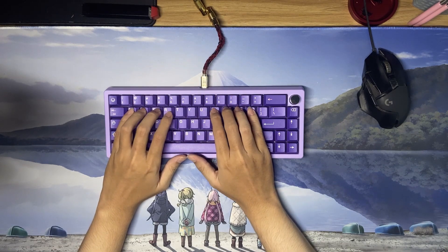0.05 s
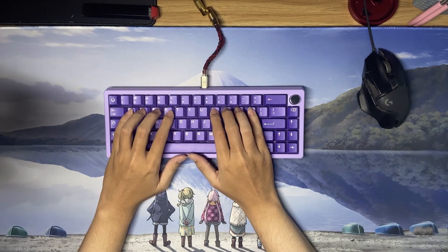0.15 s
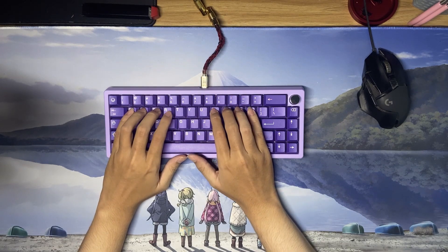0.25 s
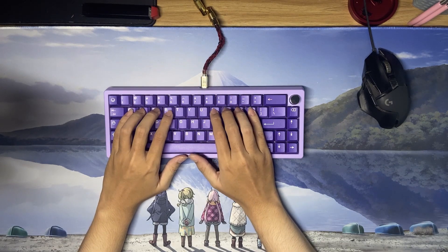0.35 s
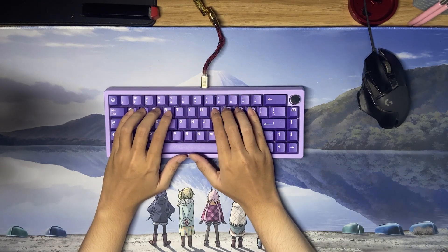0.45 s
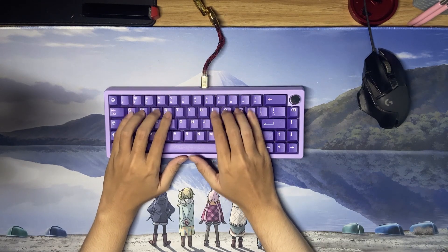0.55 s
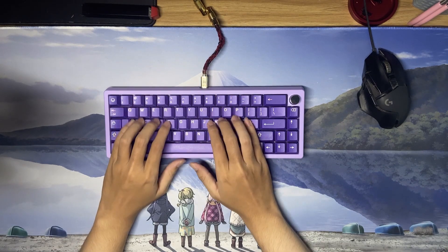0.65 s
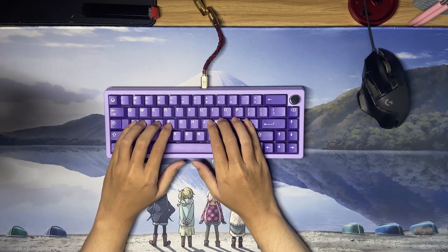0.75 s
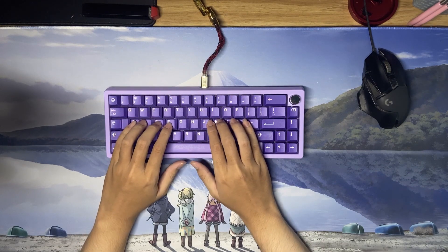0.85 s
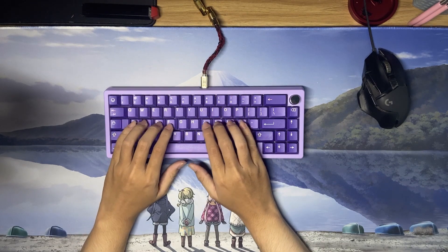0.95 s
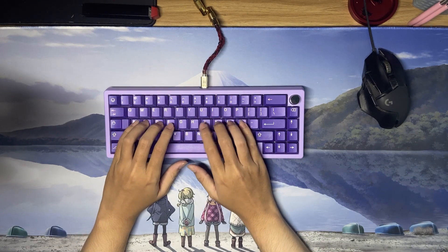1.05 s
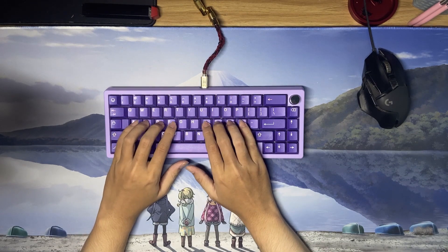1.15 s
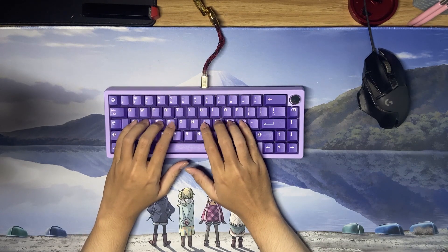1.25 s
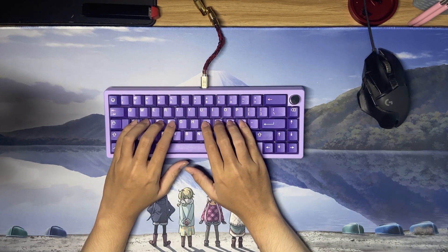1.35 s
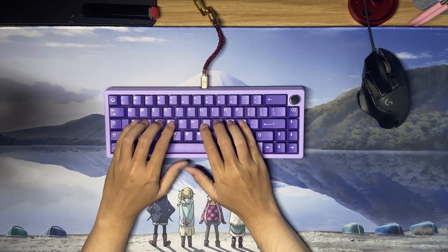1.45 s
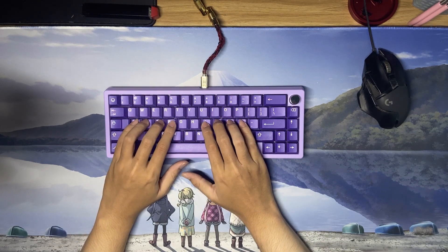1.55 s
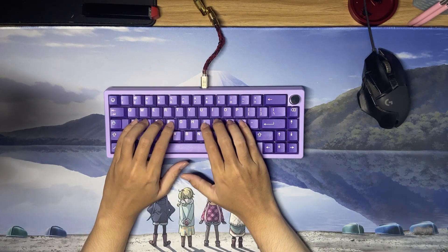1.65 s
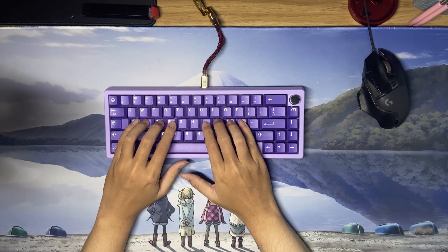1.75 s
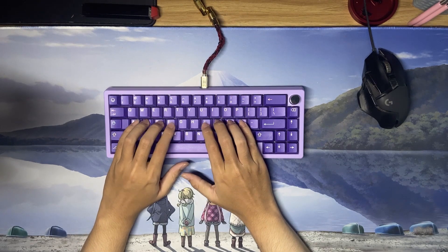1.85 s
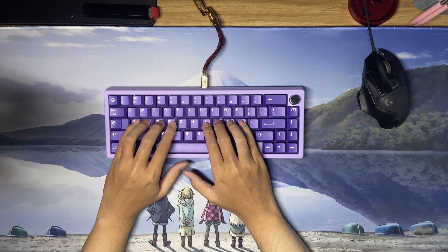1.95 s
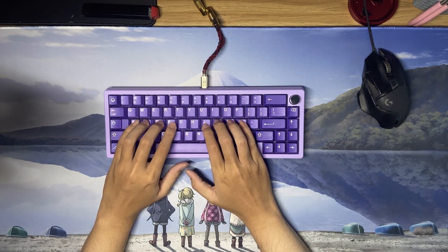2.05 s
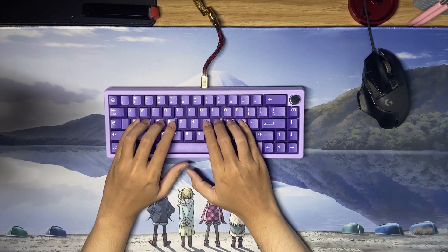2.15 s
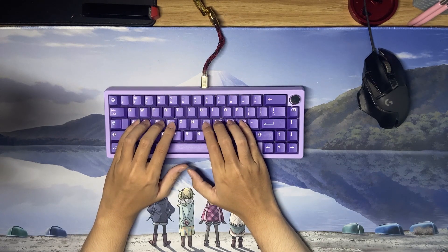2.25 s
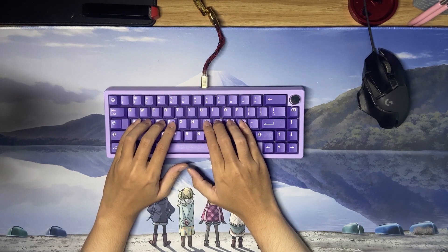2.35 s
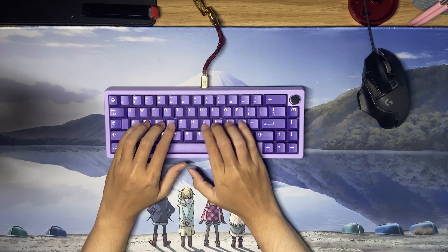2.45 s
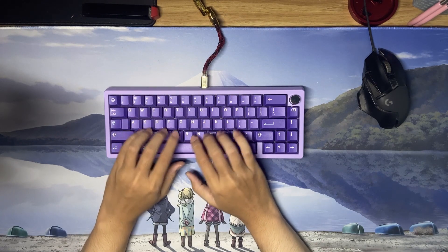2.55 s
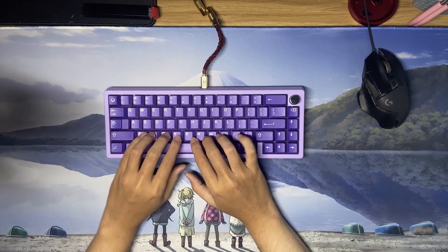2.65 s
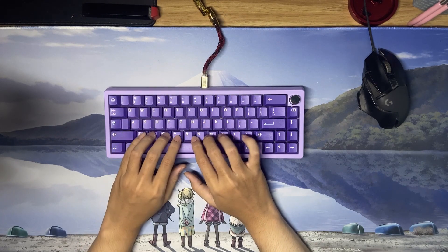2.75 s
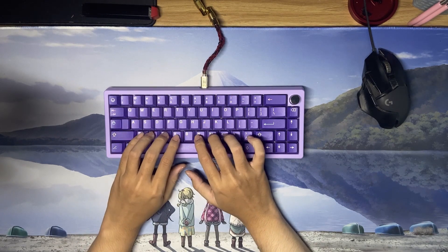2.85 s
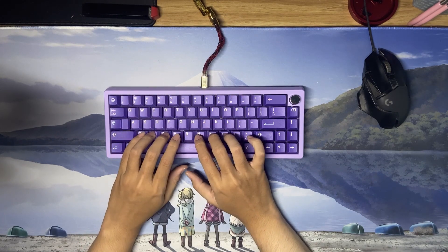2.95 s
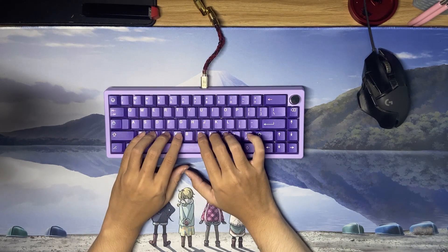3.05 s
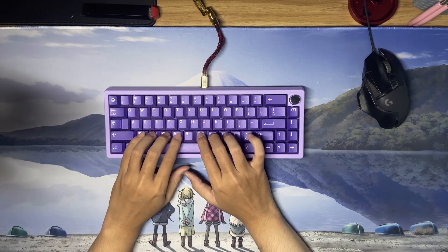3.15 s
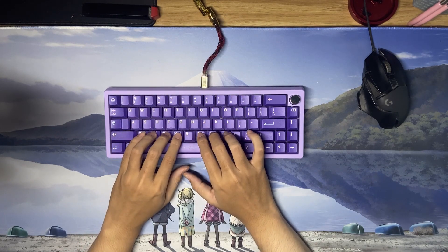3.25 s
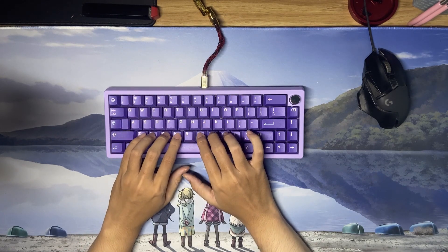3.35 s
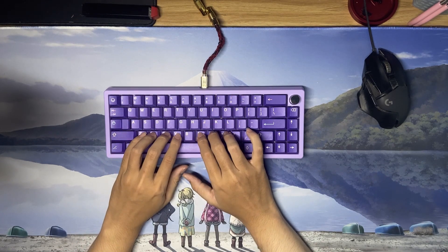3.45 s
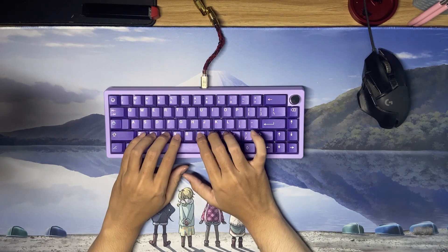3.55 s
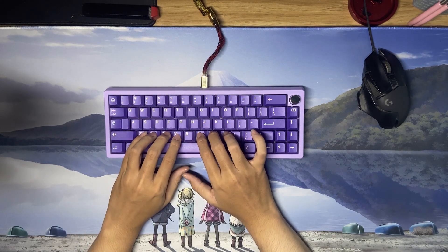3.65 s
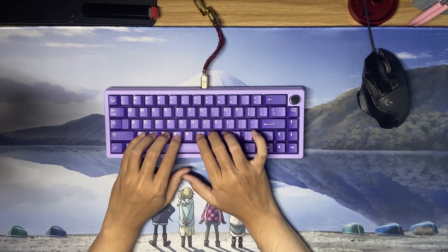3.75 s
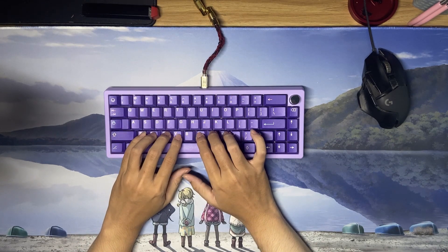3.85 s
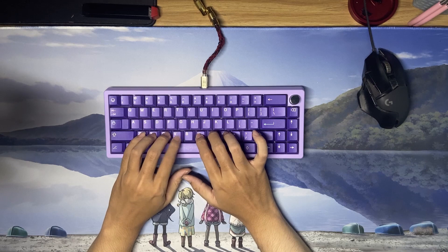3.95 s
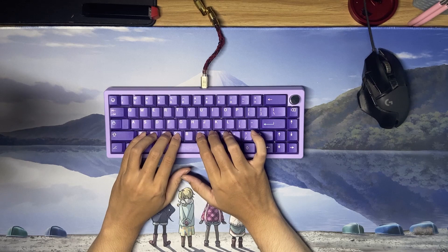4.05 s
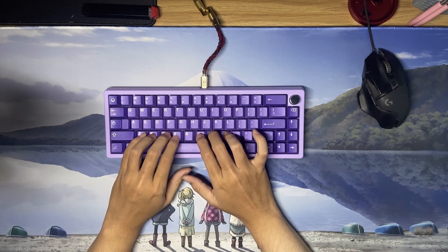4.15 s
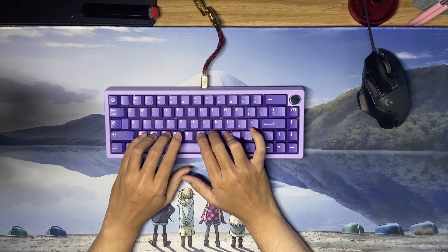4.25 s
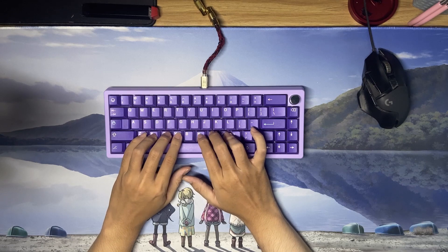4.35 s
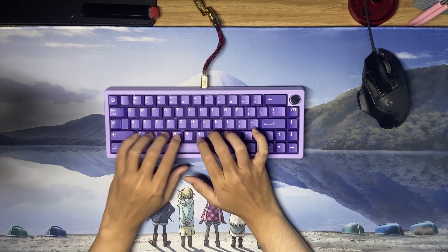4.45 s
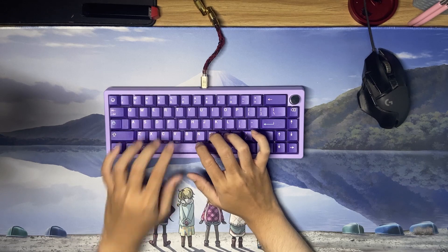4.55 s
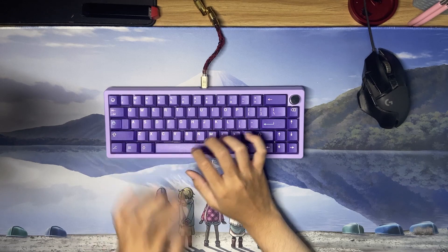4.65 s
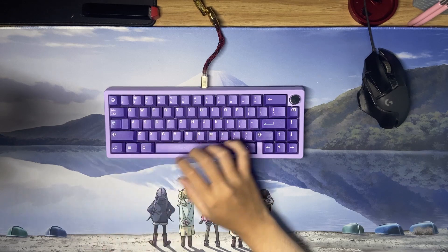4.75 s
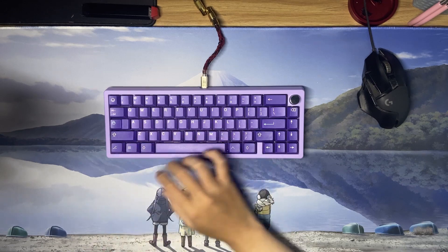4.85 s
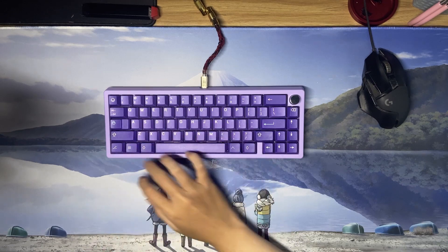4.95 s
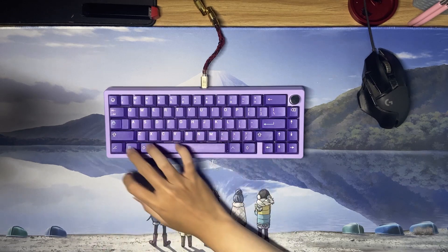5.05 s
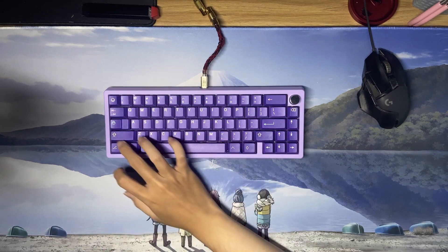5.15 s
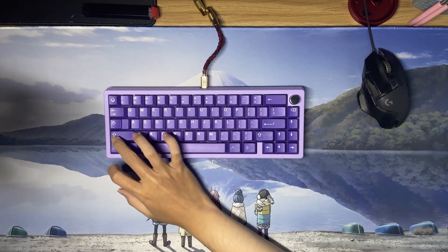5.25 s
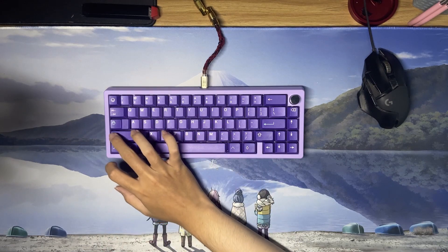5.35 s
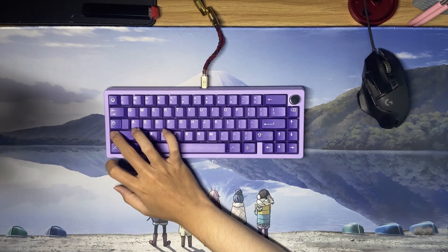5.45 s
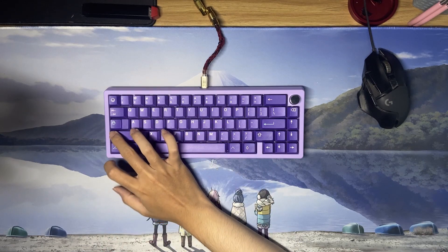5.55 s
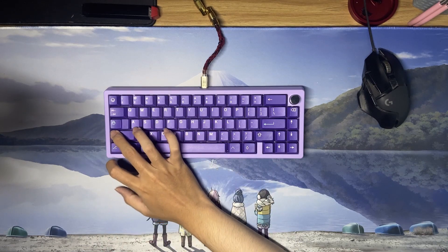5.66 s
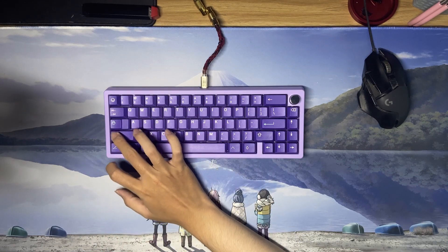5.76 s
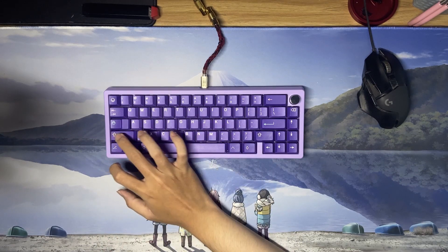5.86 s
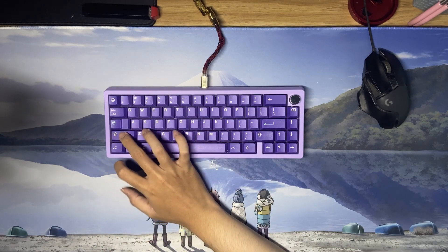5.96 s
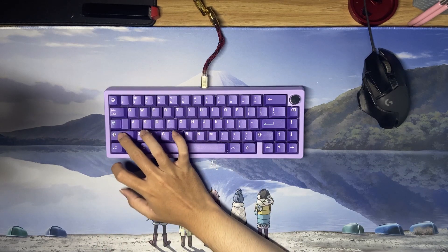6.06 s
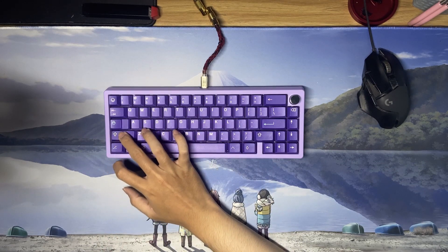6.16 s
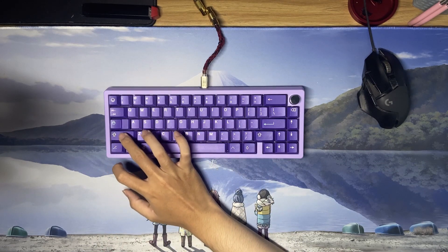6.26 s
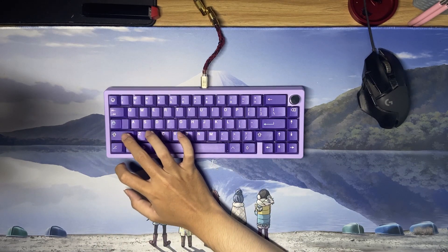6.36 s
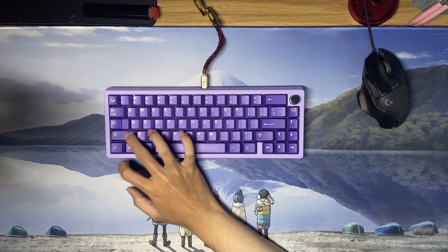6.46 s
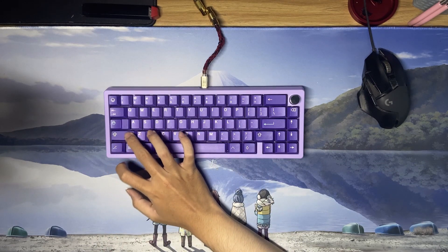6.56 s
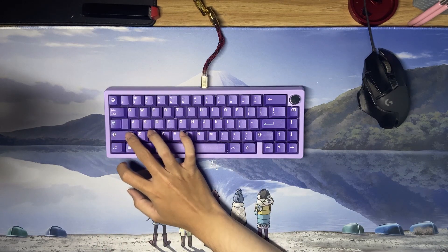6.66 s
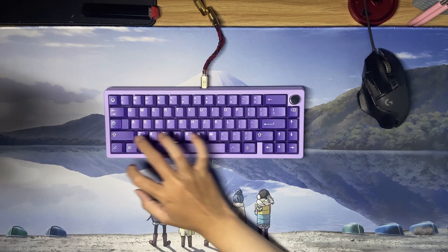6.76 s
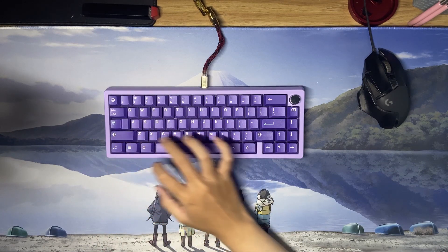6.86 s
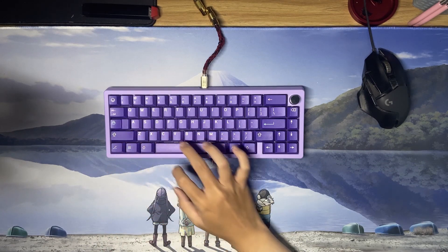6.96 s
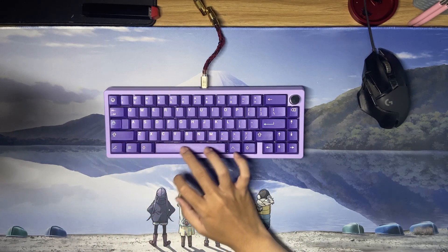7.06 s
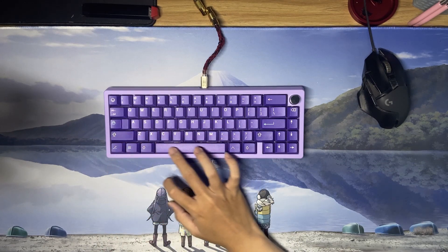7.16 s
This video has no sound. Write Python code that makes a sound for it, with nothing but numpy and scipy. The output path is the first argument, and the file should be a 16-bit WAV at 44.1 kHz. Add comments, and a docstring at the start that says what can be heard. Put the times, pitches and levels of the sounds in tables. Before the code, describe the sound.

Rapid smooth key clacks on a desk mat, a break, then one hand slowly pressing big stabilizer keys that thock and rattle metallically.

```python
"""Fast typing on a mechanical keyboard with linear switches, in three bursts, on a desk mat near a microphone.
Each landing or returning key is a blow that excites the resonances of its cap and case.
Then one hand tries the wide keys at the left edge: stems scrape, plate modes ring and metal pings.
Hands brush over the caps as swells of noise, and the desk thumps softly as decaying or swelling sines.
Wavering sines make the hum of a fan, over steady coloured noise, in a small dry room."""
import sys
import numpy as np
from scipy import signal
from scipy.fft import rfft, irfft
from scipy.io import wavfile

SR = 44100
rng = np.random.default_rng(int(sys.argv[2]) if len(sys.argv) > 2 else 0)


def log_audio(samples):
    """Write samples as a 16-bit WAV file to the path given in sys.argv[1]."""
    # one column per channel
    frames = np.atleast_2d(samples).T
    # limit to full scale, then quantise
    limited = np.clip(frames, -1, 1)
    pcm = np.round(limited * 32767).astype(np.int16)
    wavfile.write(sys.argv[1], SR, pcm)


N = 317079
SIZE = 4096  # samples in one impulse response
HZ = np.maximum(np.arange(SIZE // 2 + 1) * SR / SIZE, 1)
T = np.arange(N) / SR

# Clear strokes of letter keys, landing or springing back.
# Each row: time in seconds, energy of the direct blow in dB, cap resonance in Hz.
LETTER_STROKES = [(.0086, -2, 3480), (0.0159, -4.5, 3540), (0.0406, 1, 3050), (0.0589, 4.5, 3060),
                  (.0826, -2, 3040), (.1202, -11, 2470), (.1732, -12, 2680), (0.1888, -5.5, 2510),
                  (0.2041, -7.5, 3540), (.2193, -4, 3020), (0.2301, 2, 2440), (0.263, 2.5, 2940),
                  (0.3001, -6.5, 2860), (.3098, -3, 2300), (.3496, -10.5, 2860), (0.3685, -1.5, 2520),
                  (0.4225, -1.5, 3000), (0.4373, -0.5, 2650), (.4469, 3, 2760), (.4663, -6, 2700),
                  (0.5152, -11, 2000), (.5222, -14, 2580), (0.5745, -14.5, 2480), (1.006, -22, 2520),
                  (1.0453, -0.5, 2410), (1.0529, -4, 3020), (1.0636, .5, 2620), (1.0691, 3, 3000),
                  (1.1007, 1.5, 2970), (1.1115, -4, 2960), (1.1501, 0, 1990), (1.2133, -6.5, 2740),
                  (1.2396, 0, 3000), (1.2555, -2.5, 3180), (1.2721, 5, 3000), (1.279, 6, 2710),
                  (1.319, 3.5, 2800), (1.3418, -4, 2950), (1.3608, -0.5, 3040), (1.3749, -6.5, 2440),
                  (1.388, -6, 2470), (1.4283, -1.5, 2240), (1.4727, -.5, 3450), (1.4906, 1, 3250),
                  (1.4955, 5, 2580), (1.5352, -1, 3040), (1.5671, 1.5, 2780), (1.5723, -5.5, 2580),
                  (1.6271, -1.5, 2440), (1.6368, -5.5, 2360), (1.6725, 3.5, 3300), (1.6774, 5, 2840),
                  (1.7055, 1, 2900), (1.7366, 1, 2900), (1.7684, -4.5, 2100), (1.7718, -3.5, 2400),
                  (1.835, 1, 2320), (1.8637, -6.5, 3830), (1.8825, 2.5, 3030), (1.889, 6, 2580),
                  (1.8958, 1, 3160), (1.932, -2.5, 2770), (1.9994, -3.5, 1990), (2.0384, -3.5, 2430),
                  (2.0593, -2.5, 2230), (2.0833, 0, 3600), (2.1064, 2, 3040), (2.117, 7, 2850),
                  (2.138, 1.5, 2830), (2.1974, -0.5, 2180), (2.2073, -6, 2300), (2.2403, -6, 2360),
                  (2.2815, -14.5, 3870), (2.306, -3, 2960), (2.3102, 2, 2800), (2.323, 2, 2970),
                  (2.4129, -3, 2150), (2.442, -4.5, 2230), (2.9432, -7.5, 2730), (2.9612, 0, 2720),
                  (2.987, 3, 2600), (3.0037, -3.5, 2720), (3.0218, -4, 2420), (3.0428, 1, 2710),
                  (3.077, -6, 2080), (3.094, -5, 2330), (3.1488, -4, 2270), (3.1926, 3.5, 2860),
                  (3.205, -5, 2790), (3.249, 3, 3500), (3.2814, -4, 2700), (3.3012, -8, 2380),
                  (3.351, -6.5, 2500), (3.3833, 4, 2920), (3.392, 1.5, 2700), (3.414, -6, 2780),
                  (3.44, 3.5, 2830), (3.4863, -4.5, 2470), (3.4991, -10, 2210), (3.549, -3, 1830),
                  (3.5765, 1, 2700), (3.5851, 5.5, 2730), (3.595, -3.5, 2740), (3.6291, 1, 2400),
                  (3.653, -3, 1840), (3.697, -1, 2700), (3.71, -9, 2600), (3.7346, -5.5, 1740),
                  (3.767, 3, 2440), (3.7931, 0, 2650), (3.8177, 3, 2400), (3.8842, -9, 2430),
                  (3.9311, -7, 1750), (3.9576, 4, 2770), (3.9728, -5, 2660), (3.9832, 3.5, 2700),
                  (4.0195, -0.5, 2760), (4.0264, 2, 2440), (4.0816, -9, 2460), (4.1023, -6, 1840),
                  (4.1435, 0.5, 2470), (4.1492, -3, 2500), (4.177, 0.5, 2900), (4.1961, -3.5, 2630),
                  (4.2826, -5, 2320), (4.3634, -14, 2170), (4.3919, -14.5, 2270)]
# Colour of a clack apart from its cap resonance. Each row: frequency in Hz, relative gain in dB.
CLACK_COLOUR = [(300, -11.5), (700, -9.5), (1150, -1.5), (1750, -7), (2600, -0.5), (4000, -5.5), (5500, -7),
                (6300, -16), (8800, -12.5), (10200, -5), (11500, -17), (15500, -29.5)]
# Bursts of typing, each on its own row of keys.
# Each row: start in seconds, end in seconds, base contact tick in dB, base case body in dB.
TYPING_BURSTS = [(0, .48, 2, 1), (1.05, 2.44, -3.5, 2), (2.949, 4.2, 3, 3.5)]
# Wide keys going down and coming up. Each row: time in seconds, energy of the direct blow in dB,
# case body in dB, contact tick in dB, metal ping relative to the plate modes in dB.
WIDE_STROKES = [(5.441, 4, 2.5, -1, 9.5), (5.5315, -6, 3.5, -17, 11), (5.611, 2.5, 8.5, 6.5, 7.5),
                (5.708, -6, 6.5, -18, 12), (5.927, -2.5, 1, -11, -13), (6.014, -3.5, 2.5, -8.5, -6),
                (6.089, 4.5, 3, -11, 10.5), (6.194, -24.5, 11, -14, -3), (6.399, -5, -0.5, -2.5, 13),
                (6.482, -10, 6, -2.5, -5), (6.5473, -1, 1, -0.5, 12.5), (6.639, -6, 6, -4, 8)]
# Modes of a wide key on the plate. Each row: frequency in Hz, width in Hz, relative gain in dB.
PLATE_MODES = [(956, 130, -7), (1105, 240, -1), (1615, 210, 0.5), (2110, 190, 3.5), (2410, 150, 6),
               (3710, 700, -3), (4260, 500, -4.5), (7200, 500, -9)]
# Colour of a dry stem sliding in a wide key. Each row: frequency in Hz, relative gain in dB.
SCRAPE_COLOUR = [(600, -22), (2500, -3), (4000, -6), (5300, -4.5), (7200, -12), (10500, -16), (12300, -8.5),
                 (14000, -31)]
# The desk booms under the weight of the hands.
# Each row: middle in seconds, length in seconds, mode in Hz, rms level at the middle in dB.
DESK_BOOMS = [(0.143, 1.8, 37.83, -45.5), (1.506, 0.89, 37, -51), (2.59, 0.036, 227, -44),
              (3.2, 4.3, 37.5, -55.5), (3.338, .55, 84.3, -46), (5.56, 0.32, 35.8, -48),
              (6.33, 1.2, 36, -46.5)]
# Skin brushing over caps and mat. Each row: middle in seconds, length in seconds, mean peak level in dB.
SKIN_BRUSHES = [(0.585, 0.3, -49), (2.606, 0.25, -50.5), (4.475, 0.21, -58.5), (4.99, .08, -67),
                (5.056, 0.69, -60.5), (6.805, 0.62, -64), (7.155, 0.28, -61)]
# Colour of a brush. Each row: frequency in Hz, relative gain in dB.
BRUSH_COLOUR = [(300, -10), (1000, -3.5), (3500, -0.5), (7000, -6.5), (12000, -11), (16000, -28)]
# Fan and mains hum. Each row: frequency in Hz, mean rms level in dB.
HUM_TONES = [(118.2, -54.5), (157, -64), (226.1, -61.5)]
# Colour of the room air. Each row: frequency in Hz, relative density in dB.
AIR_COLOUR = [(30, -4.5), (52, -11.5), (85, -4), (125, -7.5), (250, -14), (490, -17.5), (950, -27.5),
              (2800, -36.5), (16000, -41)]

# Firmer strokes tick harder; weaker strokes and caps pitched above the middling one have more low body.
CAP_HZ, TICK_DB_PER_DB, BODY_DB_PER_DB, BODY_DB_PER_OCTAVE = 2660, 0.5, -0.28, 16
TICK_SPREAD_DB, BODY_SPREAD_DB = 0.86, 1
# Softer key strokes fall at random times among the clear strokes.
SOFT_PER_S, SOFT_DB, SOFT_RANGE_DB = 14, -11.5, 4
SOFT_HZ, SOFT_SPREAD_OCTAVES = 2400, 0.16
# A firm stroke often meets twice: a lighter contact comes just ahead, by this time on average.
FIRM_DB, DOUBLE_SHARE, DOUBLE_LEAD_S, DOUBLE_DB = 2, 0.7, 0.00149, -7.5


def typing(rattle_db=-19, rattle_share=0.51, slide_db=-27, slide_s=0.01):
    """Friction, then impact: every stroke slides and clacks; some leave a loose cap rattling just after."""
    out = np.zeros(N)
    for s, db, cap_hz in strokes():
        odds, lag, pitch = rng.random(3)
        body_db, tick_db = contact(s, db, cap_hz)
        gain = letter_gain(cap_hz, body_db, tick_db)
        add(out, s - slide_s, undb(db + slide_db) * slide(gain, slide_s))
        blow = clack(gain, case_db=-11.5, case_t60=0.025)
        add(out, s, undb(db) * room(blow))
        if odds < rattle_share:
            loose_cap = letter_gain(2200 + 900 * pitch, body_db=4.0, tick_db=-19.0)
            # the rattle depends only half on the force of the stroke
            rattle = undb(db / 2 + rattle_db) * unit(strike(loose_cap))
            add(out, s + 0.003 + 0.04 * lag, rattle)
    return out


def strokes():
    """Discrete impacts, unordered, as (s, dB, cap Hz): clear strokes, lighter first contacts, soft strokes."""
    out = list(LETTER_STROKES)
    chances = rng.random((len(LETTER_STROKES), 2))
    for (s, db, cap_hz), (odds, lead) in zip(LETTER_STROKES, chances):
        if db > FIRM_DB and odds < DOUBLE_SHARE:
            out.append((s - DOUBLE_LEAD_S * (0.5 + lead), db + DOUBLE_DB, cap_hz))
    for start, end, *_ in TYPING_BURSTS:
        # one soft stroke at a random moment of each equal slot
        times = start + (np.arange(64) + rng.random(64)) / SOFT_PER_S
        for s, (force, pitch) in zip(times, rng.standard_normal((64, 2))):
            if s < end:
                soft_db = SOFT_DB + SOFT_RANGE_DB * np.tanh(force)
                soft_hz = SOFT_HZ * 2 ** (SOFT_SPREAD_OCTAVES * pitch)
                out.append((s, soft_db, soft_hz))
    return out


def contact(s, db, cap_hz):
    """Excitation spectrum: case body and tick in dB follow the row of keys, the force and the cap pitch."""
    nearest = min(TYPING_BURSTS, key=lambda burst: abs(s - (burst[0] + burst[1]) / 2))
    _, _, tick_db, body_db = nearest
    body_db += BODY_DB_PER_DB * db + BODY_DB_PER_OCTAVE * np.log2(cap_hz / CAP_HZ)
    body_db += BODY_SPREAD_DB * rng.standard_normal()
    tick_db += TICK_DB_PER_DB * db + TICK_SPREAD_DB * rng.standard_normal()
    return body_db, tick_db


def letter_gain(cap_hz, body_db, tick_db):
    """Damped resonance: a small plastic cap has one broad mode."""
    cap = resonance(cap_hz, width_hz=1177)
    return colour(CLACK_COLOUR) * cap * touch(body_db, tick_db) * uneven(6.5)


def uneven(depth_db):
    """Individual modes: every blow has its own peaks and dips, deepest in the treble."""
    ripple = np.interp(HZ / 520, np.arange(64), rng.uniform(-0.97, 1, 64))
    return undb(depth_db * np.tanh(HZ / 5000) * ripple)


def touch(body_db, tick_db):
    """Contact spectrum: a deep stroke drives the case; a hard contact adds treble."""
    return colour([(1400, body_db), (2300, 0.0076), (3200, 0.0025), (5500, tick_db)])


def slide(gain, length_s):
    """Friction noise: the stem rubs along its housing, louder until it lands."""
    count = int(length_s * SR)
    rub = rng.standard_normal(SIZE)[:count] * np.linspace(0.4, 1, count)
    return unit(signal.fftconvolve(rub, strike(gain)))


def clack(gain, case_db, case_t60):
    """Impact and reverberation: a blow on a cap, then the short dense ring of the case, new each time."""
    low_cut = 1 / np.sqrt(1 + (280 / HZ) ** 4)
    blow = unit(strike(gain * low_cut))
    # bending waves spread the blow over a fraction of a millisecond
    dispersion = np.exp(-2j * np.arctan2(HZ * 4500, 6000 ** 2 - HZ ** 2))
    direct = irfft(rfft(blow) * dispersion)
    case_colour = strike(colour([(1300, 7.5), (2600, 1), (6000, 1)]))[:SIZE // 8]
    driven = signal.fftconvolve(direct, case_colour)
    case = signal.fftconvolve(driven, tail(case_t60, 0.0011, size=SIZE))[:SIZE]
    return direct + undb(case_db) * case


def wide_keys(slide_db=-22, slide_s=0.023, cap_hz=3300, cap_width_hz=3200, cap_db=-6):
    """Modal superposition: the stem scrapes, the long cap knocks on the plate and a metal part pings."""
    out = np.zeros(N)
    plate_power = sum((undb(db) * resonance(hz, width)) ** 2 for hz, width, db in PLATE_MODES)
    cap = undb(cap_db) * resonance(cap_hz, cap_width_hz)
    # both ends of the spectrum roll off
    ends = 1 / np.sqrt((1 + (700 / HZ) ** 6) * (1 + (HZ / 5600) ** 5))
    for s, db, body_db, tick_db, ping_db in WIDE_STROKES:
        ping = undb(ping_db) * resonance(5100, width_hz=137)
        modes = np.sqrt(plate_power + cap ** 2 + ping ** 2)
        gain = ends * modes * touch(body_db, tick_db)
        # a strong, hard stroke also scrapes more
        scrape_db = slide_db + 0.1 * (db + tick_db)
        add(out, s - slide_s, undb(scrape_db) * slide(colour(SCRAPE_COLOUR), slide_s))
        blow = clack(gain, case_db=-12.0, case_t60=0.018)
        add(out, s, undb(db) * room(blow))
    return out


def desk(thump_hz=84, thump_t60=1.0, thump_db=-57):
    """Low modes: each clear letter stroke thumps the desk faintly; leaning hands set it booming."""
    out, t = np.zeros(N), T[:SR]
    thump = np.sin(2 * np.pi * thump_hz * t) * np.exp(-np.log(1000) * t / thump_t60)
    for s, db, _ in LETTER_STROKES:
        add(out, s, undb(db + thump_db) * thump)
    for s, length, hz, db in DESK_BOOMS:
        tone = np.sin(2 * np.pi * hz * T + 0.5 * walk(4.4))
        out += np.sqrt(2) * undb(db) * swell(s, length) * tone
    return out


def hands():
    """Friction noise: skin slides in soft, slightly grainy swells."""
    pressure = sum(undb(db) * swell(s, length) for s, length, db in SKIN_BRUSHES)
    grain = undb(1.5 * walk(100))
    return pressure * grain * noise(BRUSH_COLOUR)


def background(air_db=-51.5):
    """Tones over broadband noise: a hum wavering in level and phase over nearly steady room air."""
    out = undb(air_db + 0.22 * walk(4.0)) * noise(AIR_COLOUR)
    for hz, db in HUM_TONES:
        level = np.sqrt(2) * undb(db + 2 * walk(5))
        out += level * np.sin(2 * np.pi * hz * T + 1.8 * walk(4.4))
    return out


def room(x, wet_db=-16, t60=0.35):
    """Reverberation: a small furnished room returns a quiet, duller tail, along other paths each time."""
    walls = strike(colour([(900, 5.0), (2400, -1.5), (5000, -1), (11000, -0.5)]))
    reflected = signal.fftconvolve(x, walls)
    wet = undb(wet_db) * signal.fftconvolve(reflected, tail(t60, 0.0056, size=SR // 3))
    return wet + np.pad(x, (0, len(wet) - len(x)))


def tail(t60, rise_s, size):
    """Exponential decay: dense reflections of unit energy build up and die away."""
    t = np.arange(size) / SR
    build_up = 1 - np.exp(-(t / rise_s) ** 2)
    decay = np.exp(-np.log(1000) * t / t60)
    return unit(rng.standard_normal(size) * build_up * decay)


def strike(gain):
    """Minimum phase: the causal response of an object with this gain to one sharp blow."""
    cepstrum = irfft(np.log(gain + 1e-6))
    # fold the cepstrum onto positive time
    cepstrum[1:SIZE // 2] *= 2
    cepstrum[SIZE // 2 + 1:] = 0
    return irfft(np.exp(rfft(cepstrum)))


def resonance(hz, width_hz):
    """Damped oscillator: gain of one mode, 1 at its centre."""
    return 1 / np.sqrt(1 + ((HZ ** 2 - hz ** 2) / (HZ * width_hz)) ** 2)


def colour(points, hz=HZ):
    """Spectral envelope: gain of (Hz, dB) points joined on a log-frequency axis."""
    f, db = np.transpose(points)
    return undb(np.interp(np.log(hz), np.log(f), db))


def noise(points):
    """Spectral shaping: coloured noise of rms 1."""
    hz = np.maximum(np.arange(N // 2 + 1) * SR / N, 1)
    x = irfft(rfft(rng.standard_normal(N)) * colour(points, hz), N)
    return x / x.std()


def swell(s, length):
    """Raised-cosine envelope: a soft rise and fall around time s."""
    return np.cos(np.pi * np.clip((T - s) / length, -0.5, 0.5)) ** 2


def walk(rate):
    """Random modulation: straight lines between normal draws, rate of them per second."""
    steps = rng.standard_normal(1024)
    return np.interp(T * rate, np.arange(len(steps)), steps)


def undb(db):
    """Level definition: decibels to amplitude gain."""
    return 10 ** (np.asarray(db) / 20)


def unit(x):
    """Energy normalisation: scale the sum of squares to 1."""
    return x / np.sqrt(np.sum(x ** 2))


def add(out, s, x):
    """Linear superposition: mix x into out from time s."""
    i = int(np.clip(round(s * SR), 0, N - 1))
    out[i:i + len(x)] += x[:N - i]


def scene():
    """Superposition of keys, desk, hands and background at one microphone."""
    return (typing() + wide_keys() + desk() + hands() + background())[None]


def record(dry):
    """Band limitation: the recorder cuts the top above 16 kHz."""
    # 0.2 dB passband ripple, 70 dB stopband attenuation
    low_pass = signal.ellip(8, 0.2, 70, 16000, fs=SR, output="sos")
    return signal.sosfilt(low_pass, dry)


dry = scene()
out = record(dry)
log_audio(out)
```